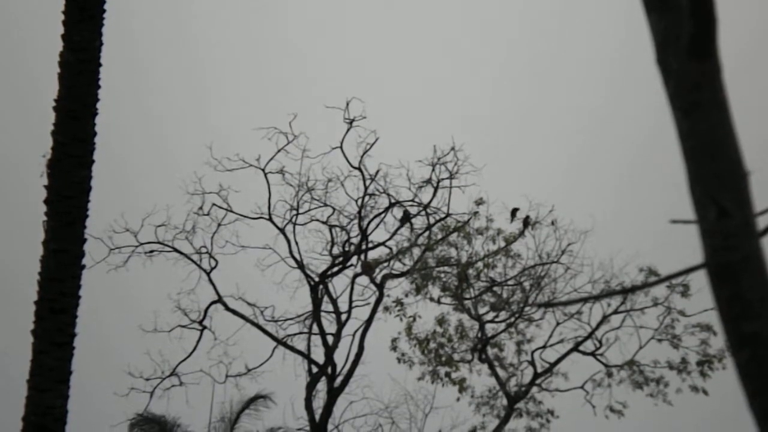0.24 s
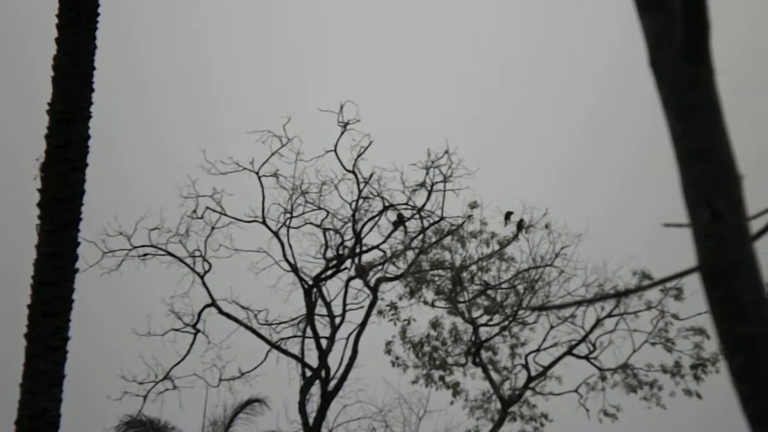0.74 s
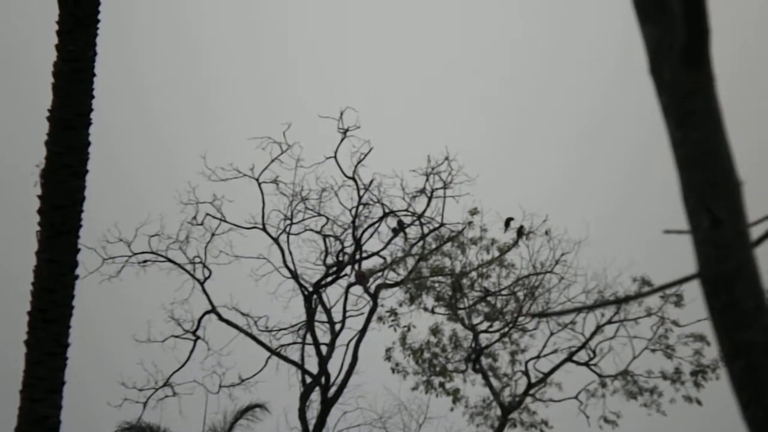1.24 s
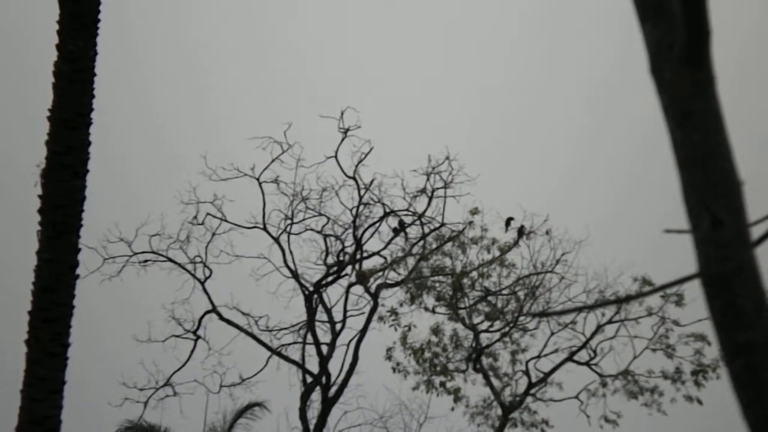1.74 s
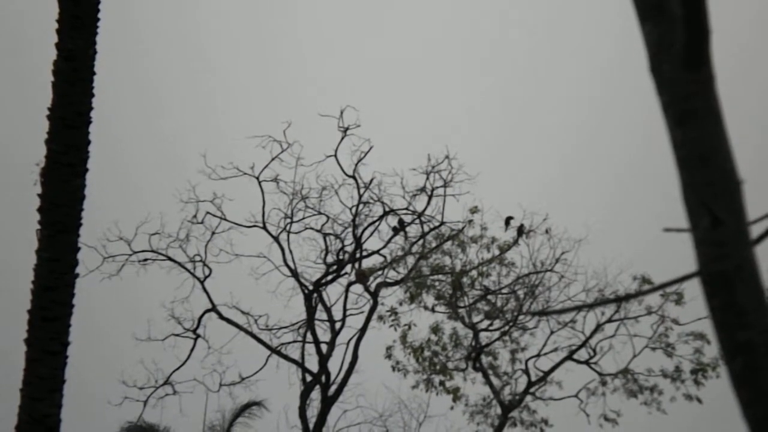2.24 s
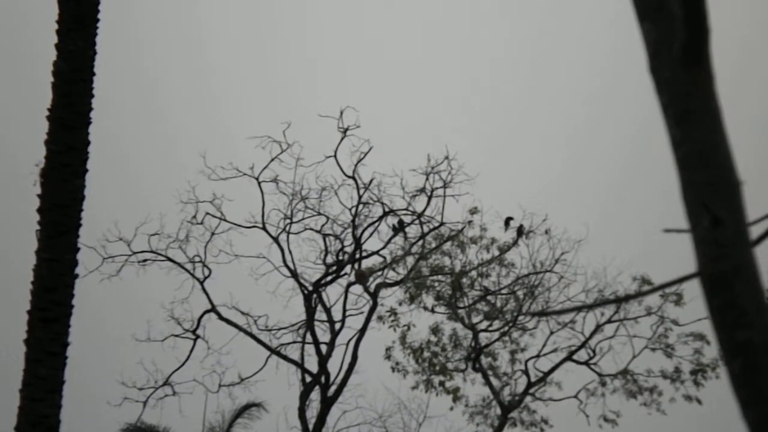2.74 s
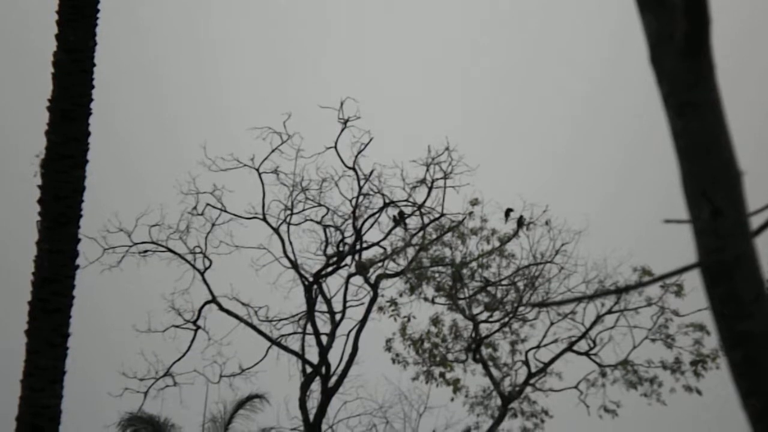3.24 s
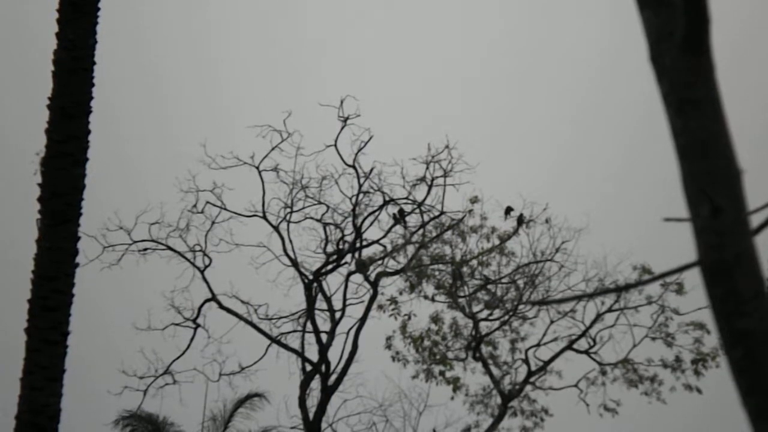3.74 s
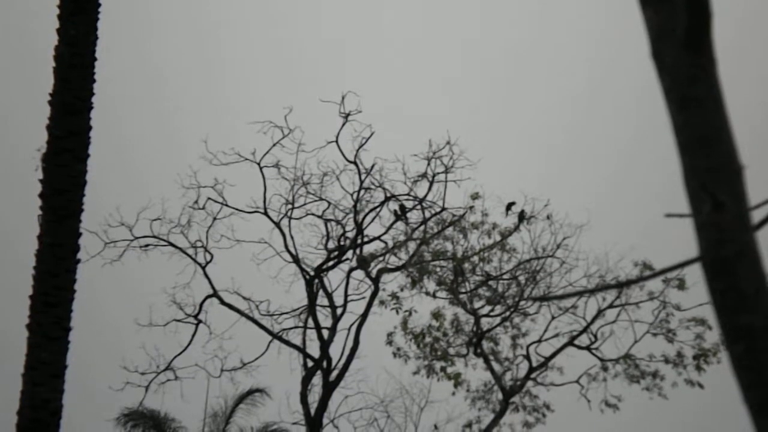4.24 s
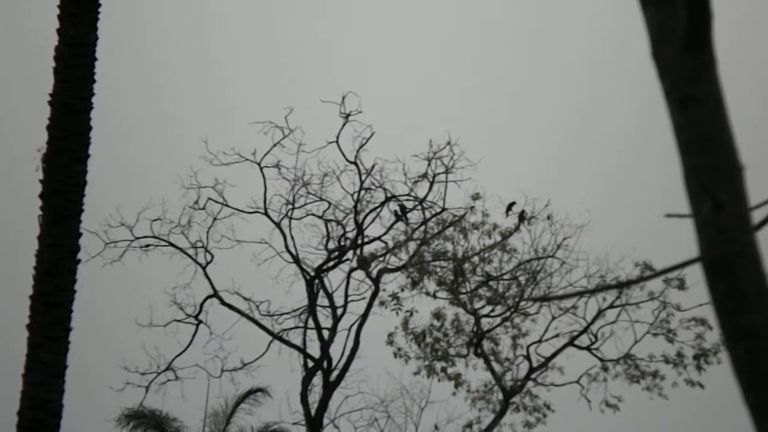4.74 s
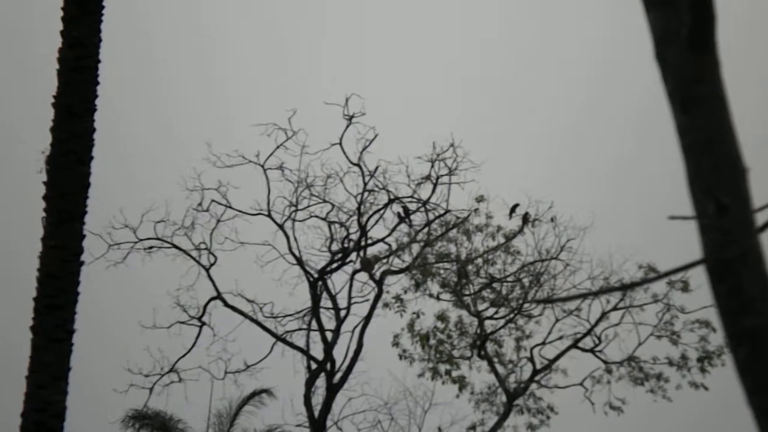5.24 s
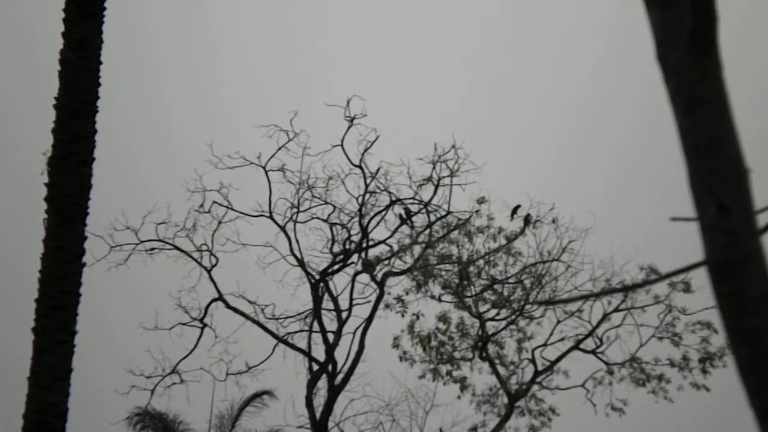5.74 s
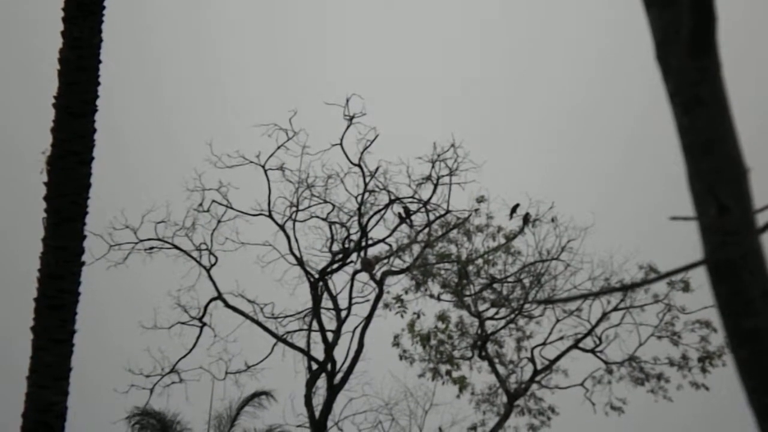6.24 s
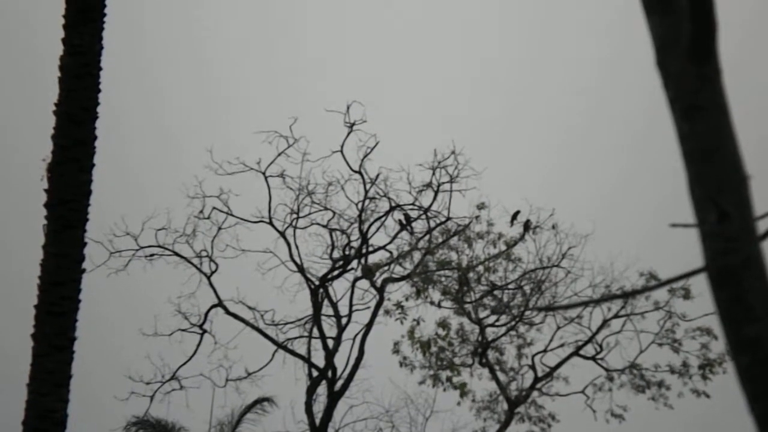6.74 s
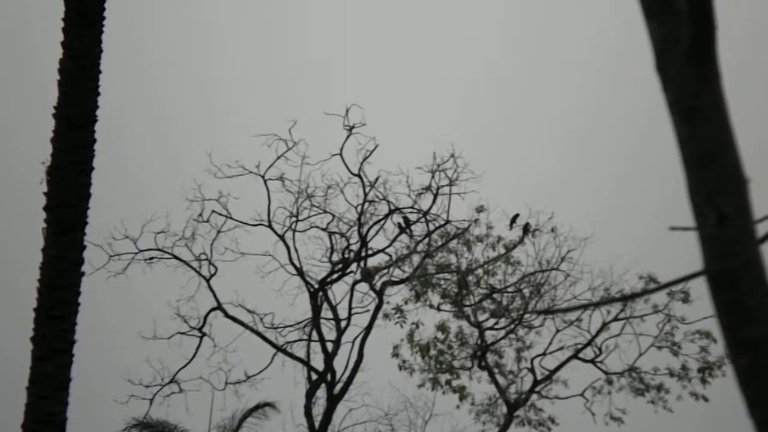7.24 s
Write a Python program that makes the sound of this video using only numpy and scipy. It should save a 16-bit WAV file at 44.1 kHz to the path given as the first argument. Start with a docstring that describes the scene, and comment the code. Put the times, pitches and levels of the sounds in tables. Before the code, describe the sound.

Several birds call from trees, heard at a modest distance with soft diffuse echoes. Clear fluted whistles come first, with one faint nasal bray and thin peeps among them. Around the middle, piercing downward chirps lead into a string of rough, throaty squawks. Afterward two weaker squawks and a few pips remain. Tonal cricket chirps, fizzing buzzes and a fine steady treble trill continue over faint air noise.

```python
"""Birds and insects across a yard

A near bird whistles by near-sine tones, with one low coo, likely a dove; small birds peep and swoop,
a nasal call brays, and a harsh caller squawks by uneven pulses and noise puffs shaped by a throat.
Crickets chirp, one near and one far, by stroking resonant wing modes; other insects trill, buzz and hum
over a soft noise wash. Trees and walls return a diffuse tail; the ground returns some notes almost at once."""
import sys
import numpy as np
from scipy import signal
from scipy.fft import rfft, irfft
from scipy.io import wavfile
from scipy.ndimage import uniform_filter1d

SR = 44100
rng = np.random.default_rng(int(sys.argv[2]) if len(sys.argv) > 2 else 0)


def generate_wav(signal):
    """Clip the signal to [-1, 1] and save it as 16-bit WAV at the path in sys.argv[1]."""
    frames = np.transpose(np.atleast_2d(signal))
    scaled = np.clip(frames, -1, 1) * 32767
    pcm = np.round(scaled).astype(np.int16)
    wavfile.write(sys.argv[1], SR, pcm)


N = 329868  # length [samples]


def gain_of(db):
    """Logarithmic level: 20 dB is a factor of ten in amplitude."""
    return 10 ** (np.asarray(db) / 20)


def evened(x):
    """Power normalisation: scales to rms 1."""
    return x / np.sqrt(np.mean(x ** 2) + 1e-20)


def read(points, hz):
    """Spectral envelope: a table interpolated on a log-frequency axis."""
    f, value = np.transpose(points)
    return np.interp(np.log(hz + 1), np.log(f + 1), value)


def add(mix, s, sound):
    """Superposition: mixes a sound in at s seconds."""
    part = mix[round(s * SR):][:len(sound)]
    part += sound[:len(part)]


def unroll(rows):
    """Linear interpolation: time and every column of a curve, at the sample rate."""
    s, *columns = np.transpose(rows)
    t = np.arange(s[0], s[-1], 1 / SR)
    return t, [np.interp(t, s, column) for column in columns]


def drift(count, per_s):
    """Low-passed noise: smooth random wavering of rms 1."""
    size = max(int(SR / per_s), 1)
    smooth = uniform_filter1d(rng.standard_normal(count), size)
    return evened(uniform_filter1d(smooth, size))


def resonate(x, modes):
    """Modal resonance: a sum of steep resonances, each of peak gain 1 before its own level."""
    out = np.zeros(len(x))
    for hz, width, db in modes:
        r = np.exp(-np.pi * width / SR)
        pole = [1, -r * np.exp(2j * np.pi * hz / SR)]
        once = signal.lfilter([1 - r], pole, x)
        twice = signal.lfilter([1 - r], pole, once)
        out += gain_of(db) * 2 * twice.real
    return out


def wash():
    """Shaped noise: distant air and microphone hiss as random short-time spectra with faint patches."""
    # spectrum of the hiss: (frequency [Hz], relative density [dB per Hz])
    spectrum = [(25, -37), (60, -21), (340, -6.5), (666, -3), (1050, -5.5), (2000, -9), (3600, -12),
                (4200, -11), (4750, -8), (5500, -10.5), (7000, -8.5), (8500, -11), (10300, -16),
                (11000, -16), (15500, -19)]
    level_db = -63
    frames, hz = N // 256 + 5, np.fft.rfftfreq(1024, 1 / SR)
    a, b, patches = rng.standard_normal((frames, 513, 3)).T
    patches = uniform_filter1d(uniform_filter1d(patches, 12, 0), 14, 1)
    patchy_db = 1.1 * evened(patches)
    z = (a + 1j * b) * gain_of(read(spectrum, hz)[:, None] + patchy_db)
    hiss = signal.istft(z, nperseg=1024, noverlap=768)[1][:N]
    return gain_of(level_db) * evened(hiss)


def treble_insects():
    """Amplitude modulation: a steady trill of short pips, a thin unbroken hum, and a flickering far chorus."""
    # far insects: (time [s], level [dB])
    chorus_level = [(0, -65.5), (1, -67), (2.3, -66), (3, -64), (4.9, -65), (5.6, -71), (6.2, -67),
                    (6.8, -66.5), (7.05, -73), (7.25, -61.5), (7.48, -75)]
    trill_hz, trill_db, trill_per_s, trill_start_s = 9020, -61, 30.0, .0263
    hum_hz, hum_db = 9779, -70
    t = np.arange(N) / SR
    place = ((t - trill_start_s) * trill_per_s) % 1 / trill_per_s  # seconds into each pip
    pips = np.clip(np.minimum(place / 0.00087, (.0115 - place) / 0.0024), 0, 1)
    pips *= gain_of(1.2 * drift(N, 20))
    trill = pips * np.sin(2 * np.pi * np.cumsum(trill_hz + 40 * drift(N, 40.55)) / SR)
    hum = np.sin(2 * np.pi * np.cumsum(hum_hz + 5 * drift(N, 50)) / SR)
    hum *= gain_of(1.3 * drift(N, 60))
    flicker = gain_of(2.8 * drift(N, 26)) * rng.standard_normal(N)
    chorus = evened(resonate(flicker, [(7704, 470, -8.0), (7400, 140, -19.0), (7950, 180, -12.0)]))
    chorus *= gain_of(np.interp(t, *np.transpose(chorus_level)))
    return gain_of(trill_db) * trill + gain_of(hum_db) * hum + chorus


def buzzer():
    """Stridulation: double wing strokes of noisy scraping excite wing resonances, in bursts."""
    # bursts: (start [s], end [s], level [dB])
    bursts = [(0.358, 0.644, -59), (1.34, 1.642, -60), (2.414, 2.775, -59), (3.365, 3.609, -58.5),
              (4.41, 4.75, -59.5), (5.357, 5.575, -59), (6.35, 6.422, -62.5), (6.678, 6.743, -59.5),
              (7.37, 7.476, -59)]
    # wing resonances: (frequency [Hz], width [Hz], gain [dB])
    wing_modes = [(6100, 200, -9.5), (6860, 620, -6), (7400, 170, -8), (8760, 230, -5), (8950, 2000, -14)]
    t = np.arange(N) / SR
    strokes = np.cumsum(150.0 * (1 + .01 * drift(N, 10))) / SR
    scrape = np.exp(-(strokes % 1) / 0.17) + 0.42 * np.exp(-((strokes + .5) % 1) / 0.43)
    buzz = evened(resonate(scrape * rng.standard_normal(N), wing_modes))
    on = sum(gain_of(db) * (t > start) * (t < end) for start, end, db in bursts)
    return buzz * uniform_filter1d(on, 300)


def crickets():
    """Stridulation: a lead stroke, a pause, then tonal wing strokes that swell, slow and end on a whole stroke."""
    # chirps of a near cricket, and of a far one in the two faint rows:
    # (start [s], level before swell and wing modes [dB], length before the last stroke ends [s])
    chirps = [(0.3143, -45, 0.16), (0.982, -46, 0.17), (1.604, -44.5, 0.17), (2.164, -44, 0.16),
              (2.773, -44.5, 0.16), (3.088, -56.5, 0.22), (3.534, -44.5, .16), (5.19, -46, 0.14),
              (5.739, -46.5, 0.15), (6.259, -45.5, 0.16), (6.798, -44.5, .17), (7.003, -59.5, 0.13),
              (7.359, -44.5, 0.16)]
    # wing modes: (frequency [Hz], random spread [Hz], gain [dB])
    wing_modes = [(4810, 108, 4), (5200, 70, -2.5), (5600, 70, -3.5), (6400, 180, -11.5)]
    near_db = -47
    far_dull = 0.68  # dB lost by the upper wing modes for each dB that a chirp lies under near_db
    out = np.zeros(N)
    for s, db, length in chirps:
        t = np.arange(0, length + .01, 1 / SR)
        strokes = np.cumsum(139 - 70 * t + 4 * drift(len(t), 100)) / SR
        place, last = strokes % 1, np.ceil(strokes[int(length * SR)])
        sounding = (strokes < 1) | ((strokes > 2) & (strokes < last))
        attack = np.minimum(place / np.where(strokes < 1, .2, .35), 1)
        scrape = attack * np.exp(-(place / 0.5) ** 2) * sounding
        swell_db = np.where(strokes < 1, -5.5, -16 + 17 * np.tanh(3.3 * t / length))
        swell_db = swell_db + 0.81 * drift(len(t), 100)
        sag_hz = 700 * (place - .25)  # each stroke slows, so its pitch falls
        wing = np.zeros(len(t))
        for hz, spread, mode_db in wing_modes:
            dull_db = (hz > 5000) * far_dull * min(db - near_db, 0)
            turns = np.cumsum(hz - sag_hz + spread * drift(len(t), 930)) / SR
            wing += gain_of(mode_db + dull_db) * np.cos(2 * np.pi * turns)
        add(out, s, gain_of(db + swell_db) * scrape * wing)
    return out


def ticks():
    """Damped vibration: small dry close taps, each two decaying partials and a little noise."""
    # taps: (time [s], level of the main partial [dB], frequency [Hz])
    taps = [(0.368, -38.5, 2750), (5.468, -50, 716), (6.674, -55, 607)]
    out, t = np.zeros(N), np.arange(600) / SR
    for s, db, hz in taps:
        ring = np.sin(2 * np.pi * hz * t) + 0.5 * np.sin(2 * np.pi * 0.69 * hz * t)
        ring += 0.034 * rng.standard_normal(600)
        decaying = gain_of(db - 60 * t / 0.018) * ring
        add(out, s, np.diff(decaying) * SR / (2 * np.pi * hz))  # the slope, scaled to keep the level at hz
    return out


def yard(x, tail_db, t60, early_db=-12):
    """Diffuse reverberation: early scatter from near branches, then a tail; two sets of returns trade places."""
    t = np.arange(SR) / SR
    taps = rng.standard_normal((2, SR)) * (rng.random((2, SR)) < .1) * (t > .004)
    tail, early = taps * gain_of(-60 * t / t60), taps * gain_of(-60 * t / .12)
    response = gain_of(tail_db) * tail / np.linalg.norm(tail[0])
    response += gain_of(early_db) * early / np.linalg.norm(early[0])
    response = signal.lfilter([.6], [1, -.4], response)  # air and leaves dull the returns
    sway = 2 * np.pi * .3 * drift(N, 45)  # moving leaves blend one set into the other at even power
    first, second = signal.fftconvolve(x[None], response, axes=1)[:, :N]
    return x + first * np.cos(sway) + second * np.sin(sway)


def grounded(start, sound, delay_s, share):
    """Comb interference: the direct sound and its return from the ground carve notches along a glide."""
    lag = np.zeros(round(delay_s * SR))
    return start, (np.append(sound, lag) + share * np.append(lag, sound)) / np.sqrt(1 + share ** 2)


def whistle(rows, half_db=-60, second_db=-60, third_db=-60, flutter=60, depth=0.25, warble_hz=20, bend=400):
    """Syrinx oscillation: a near sine that a slower second oscillator makes flutter in level and pitch."""
    t, (hz, db) = unroll(rows)
    hz = uniform_filter1d(hz, min(len(t) // 4, bend), mode="nearest")  # the pitch bends smoothly
    push = gain_of(.5 * (db - db.max())) * (hz / hz.max()) ** 3  # overtones grow with effort and pitch
    beat = np.cos(2 * np.pi * np.cumsum(flutter * (1 + 0.195 * drift(len(t), 48.0))) / SR)
    turns = 2 * np.pi * np.cumsum(hz + warble_hz * beat + 25 * drift(len(t), 330)) / SR
    half_lines = np.sin(turns / 2) + 0.67 * np.sin(3 * turns / 2) + np.sin(5 * turns / 2)
    tone = np.sin(turns) + gain_of(half_db) * half_lines
    tone += push * (gain_of(second_db) * np.sin(2 * turns) + gain_of(third_db) * np.sin(3 * turns))
    edge = np.clip(np.minimum(t - t[0], t[-1] - t) / 0.0015, 0, 1)
    level = np.sqrt(2) * gain_of(db + 1.1 * drift(len(t), 150))
    return t[0], level * tone * (1 + np.clip(depth, 0, 1) * beat) * edge


def swoop(start, fall, top_hz, end_hz, db, bow, loudest, upstroke):
    """Frequency glide: a quick upstroke if it is long enough, then a fall that swells and fades."""
    u = np.linspace(0, 1, num=16)
    level = db + np.interp(u, [0, loudest, 1], [-22, 0, -13.5])
    rows = np.transpose([start + fall * u, top_hz + (end_hz - top_hz) * u ** bow, level])
    if upstroke < .016:
        return rows
    lead = [(start - upstroke, 5280, -52), (start - upstroke / 2, .95 * top_hz, -63)]  # (s, Hz, dB)
    return np.vstack([lead, rows])


def small_birds(mix):
    """Frequency modulation: falling swoops, level pips and wavering peeps, all near sines."""
    # swoops: (time of the top [s], fall [s], top [Hz], end [Hz], peak level [dB],
    # bow of the fall [1 = straight], loudest place [share of the fall], upstroke [s, none under 0.016])
    swoops = [ (0.219, 0.048, 8200, 6600, -56, 1.2, 0.36, 0), (.3, 0.046, 7800, 6550, -57, 1, .25, 0),
              (.51, 0.068, 7850, 5900, -55, 2.1, 0.57, 0),
              (0.701, 0.041, 6700, 5540, -60.5, 1.1, 0.48, 0.005),
              (0.809, 0.057, 8000, 5740, -56.5, 1.4, 0.39, 0), (1.188, 0.06, 7600, 5500, -58, 3.1, .7, 0),
              (1.876, 0.1, 8300, 5930, -56.5, 1, 0.47, 0), (2.14, 0.057, 7960, 5870, -56.5, 0.89, 0.87, 0),
              (3.13, 0.082, 8070, 5760, -45.5, 3, 0.85, 0.022),
              (3.291, 0.088, 8320, 5600, -39, 1.9, 0.72, .025),
              (3.46, 0.078, 8200, 5840, -41.5, 2.2, 0.75, 0),
              (3.635, 0.099, 8120, 5920, -39.5, 2.6, 0.85, 0),
              (3.81, .17, 8500, 5190, -39.5, 0.95, 0.23, 0.014),
              (4.255, 0.17, 8650, 6050, -44, 0.93, 0.51, 0.023), ]
    # pips: (start [s], length [s], pitch [Hz], starting level [dB])
    level_pips = [(1.605, 0.042, 7050, -54), (1.717, 0.046, 7060, -55.5), (2.585, 0.014, 5700, -62),
                  (2.646, .012, 4900, -63), (2.887, 0.03, 8100, -58), (3.333, .02, 5700, -64),
                  (3.537, 0.02, 7950, -52), (3.736, 0.026, 6950, -50.5), (6.385, 0.038, 7000, -55.5),
                  (6.502, 0.03, 6960, -54)]
    # wavering notes, one table a note: (time [s], pitch [Hz], level [dB])
    peeps = [
        [(0, 4320, -66), (.013, 5520, -67), (.033, 5500, -66), (.047, 4700, -64), (.065, 5480, -69),
         (.078, 5300, -72), (.09, 4100, -69), (.103, 5200, -76), (.13, 5170, -62), (.145, 5200, -73)],
        [(2.34, 4670, -70), (2.348, 3820, -57), (2.36, 3840, -57), (2.368, 3950, -62)],
        [(2.75, 7870, -60), (2.78, 7140, -47), (2.81, 7960, -53)],
        [(2.945, 7800, -52), (2.977, 7020, -44.5), (3.004, 7530, -48.5), (3.018, 6970, -45),
         (3.04, 5900, -52.5)],
        [(3.425, 3180, -68), (3.44, 3350, -71), (3.45, 4000, -66)],
        [(4.11, 6900, -54), (4.14, 7300, -40), (4.17, 8020, -52)],
        [(6.67, 5360, -78), (6.72, 5750, -83), (6.775, 5770, -78), (6.79, 5600, -61), (6.797, 5650, -63)],
        [(7.21, 4530, -80), (7.222, 4730, -67), (7.264, 5820, -68), (7.315, 6180, -62)],
    ]
    pip_fade_db = -1.5
    curves = [swoop(*row) for row in swoops]
    for s, length, hz, db in level_pips:
        curves.append([(s, hz, db), (s + length, hz, db + pip_fade_db)])
    for rows in curves:
        add(mix, *whistle(rows, flutter=230, depth=0.34))
    for rows in peeps:
        add(mix, *whistle(rows, bend=200))


def squawk(rows, throat, rough, uneven, low_db=-60):
    """Source and filter: strong and weak pulses in turn and noise puffs pass a throat; low lines stay clear."""
    # noise gain toward the treble, taken off the pulses: (frequency [Hz], gain [dB])
    airy_table = [(4200, -2.5), (6200, 2.5)]
    broken_db, broken_per_s = 8, 80  # each partial wavers in level on its own
    t, (db, hz) = unroll(rows)
    hz = uniform_filter1d(hz, 300, mode="nearest")
    steady = np.cumsum(hz / 2) / SR  # turns of a strong-weak pair
    pairs = steady + np.cumsum(hz * .022 * rough * drift(len(t), 300)) / SR
    folds = np.zeros(len(t))
    for k in range(1, 24):
        strength = uneven if k % 2 else 1  # odd lines make the pulses unequal
        waver_db = broken_db * (.3 * rough + .02 * k) * drift(len(t), broken_per_s)
        folds += strength * gain_of(waver_db) * np.cos(2 * np.pi * k * pairs + 0.099 * k * k)
    puffs = (0.26 + np.exp(-(2 * pairs % 1) / 0.26)) * rng.standard_normal(len(t))
    f = np.fft.rfftfreq(len(t), 1 / SR)
    airy = gain_of(read(airy_table, f))
    drive = rfft((1 - rough) * evened(folds)) / airy + rfft(rough * evened(puffs)) * airy
    voiced = irfft(drive * gain_of(read(throat, f)), len(t))
    low = np.zeros(len(t))
    for k, share in [(4, .75), (8, 1.1)]:  # the pitch and its octave
        low += share * np.cos(k * np.pi * steady) * gain_of(4 * drift(len(t), 70))
    call = evened(voiced) * gain_of(3.4 * rough * drift(len(t), 150)) + gain_of(low_db) * low
    return t[0], gain_of(db + 6.5) * call * signal.windows.tukey(len(t), .24)


def bray(mix):
    """Formant filtering: one clear nasal call of mostly regular pulses."""
    # curve of the call: (time [s], effort [dB], pitch [Hz])
    curve = [(1.3, -55, 796), (1.32, -57, 967), (1.345, -56.5, 979), (1.4, -59, 1002), (1.415, -59.5, 967),
             (1.435, -61, 743)]
    # throat: (frequency [Hz], gain [dB])
    nasal_throat = [(1200, -42), (1600, -29), (1950, -7), (2950, -4.5), (3450, -9), (3900, -22),
                    (5000, -24), (5900, -12), (6800, -14), (7400, -2), (8300, -19), (8900, -0.5),
                    (9800, -21), (10400, -5), (11500, -49)]
    add(mix, *squawk(curve, nasal_throat, 0.11, 0.63))


def gasps(mix):
    """Turbulent pulsing: faint rasps as the harsh caller draws air between calls."""
    # gasps: (start [s], length [s], effort [dB], starting pulse rate [Hz])
    breaths = [(3.949, 0.047, -59, 483), (4.168, 0.066, -59, 479), (4.403, 0.057, -61.5, 485),
               (4.652, 0.078, -68, 480)]
    # throat: (frequency [Hz], gain [dB])
    gasp_throat = [(1500, -42), (2100, -18), (2500, 0), (3000, -16), (3700, -5), (4400, -14), (6500, -10),
                   (9000, -40)]
    for s, length, db, hz in breaths:
        add(mix, *squawk([(s, db, hz), (s + length, db, 1.1 * hz)], gasp_throat, 0.51, 0.83))


def harsh_call(start, climb, jump, length, db, low_hz, held_hz, rough, uneven, fall, end_pitch, clear_db, arch, tilt_db):
    """Register break: effort, pitch, roughness and strong-weak share follow a climb, break, arched hold and fall."""
    # throat before tilt: (frequency [Hz], gain [dB])
    call_throat = [(600, -34), (1000, -18), (1500, -21.5), (2000, -7.5), (2700, -4.5), (3400, -4),
                   (4000, -7), (4600, -11.5), (5250, -5.5), (5900, -9), (6500, -1), (7300, -9.5),
                   (8200, -13), (9500, -30), (12000, -51)]
    # held part: (place [share of its length], bend [share of the arch], effort [dB])
    arch_shape = [(0, -1, -3.5), (.3, -.2, -1), (.6, 0, 0), (1, -.3, -1.5)]
    start_db, end_db = -13, -10
    held = climb + jump
    falls = max(length - fall, held + .004)
    place, bend, swell_db = np.transpose(arch_shape)
    s = start + np.array([0, climb, *(held + (falls - held) * place), length])
    # effort swells evenly up to the held part
    effort = db + np.array([start_db, start_db * jump / held + swell_db[0], *swell_db, end_db])
    pitch = [.94 * low_hz, low_hz, *(held_hz * (1 + arch * bend)), end_pitch * low_hz]
    rows = np.transpose([s, effort, pitch])
    t = unroll(rows)[0]
    roughs = np.interp(t, s[[0, 1, 2, -2, -1]], [.5, .56, rough, rough, .5])
    unevens = np.interp(t, s[[1, 2, 4, -2, -1]], [.4, uneven ** 2, uneven, uneven ** 2, .4])
    # the clear low lines lead the climb and die first in the fall
    low_db = clear_db + np.interp(t, s[[1, 2, -2, -1]], [7, 0, 0, -10])
    throat = [(hz, gain_db + tilt_db * np.log2(hz / 4000)) for hz, gain_db in call_throat]
    return squawk(rows, throat, roughs, unevens, low_db=low_db)


def harsh_caller(mix):
    """Nonlinear voicing: calls climb in a low register, break up to a held pitch and fall."""
    # calls: (start [s], climb [s], break [s], whole length [s], effort [dB], low pitch [Hz], held pitch [Hz],
    # held roughness [0-1], held strong-weak share [0-1], fall [s], end pitch [share of low pitch],
    # clear low lines [dB], arch [share of held pitch], brightness [dB per octave])
    calls = [ (3.519, 0.033, 0.096, 0.15, -57, 858, 1006, 0.88, 1, 0.038, 0.81, -16.5, 0.027, -0.2),
             (3.77, 0.081, 0.013, 0.16, -42.5, 1154, 1290, 0.55, 0.7, 0.045, .8, -23.5, 0.014, 1),
             (4.006, 0.056, 0.019, 0.15, -42, 1120, 1281, 0.53, 0.8, .035, 0.85, -20.5, 0.017, 2.9),
             (4.226, 0.05, 0.011, 0.16, -43.5, 1150, 1395, 0.34, 0.06, 0.027, 0.66, -24.5, 0.06, 2.5),
             (4.479, 0.03, 0.012, 0.15, -42.5, 1111, 1464, 0.5, 0.87, 0.043, 0.81, -18.5, 0.066, 3.2),
             (4.736, .049, 0.0114, .155, -45.5, 1076, 1363, 0.26, 0.21, .03, 0.78, -19.5, .045, 2),
             (5.154, 0.054, 0.029, 0.16, -53, 979, 1070, 0.71, 0.92, 0.031, 0.85, -15.5, 0.0195, -1),
             (6.027, 0.042, 0.016, 0.17, -54, 929, 1054, 0.49, 0.97, 0.026, 0.72, -13.5, 0.025, 0.5), ]
    for row in calls:
        add(mix, *harsh_call(*row))


def drop(start, length, top_hz, db):
    """Frequency glide: the pitch falls straight while the level holds, then fades."""
    end_hz, hold, fade_db = 1365, 0.47, -14.5  # the hold is a share of the length
    u = np.array([0, hold, 1])
    return np.transpose([start + length * u, top_hz + (end_hz - top_hz) * u, db + fade_db * (u == 1)])


def near_whistlers(mix):
    """Syrinx oscillation: near whistled notes and short drops, and one low coo, likely a dove."""
    # one table a note, the last the low coo: (time [s], pitch [Hz], level [dB]);
    # the whistle at 0.52 s has two overlapping voices, a table each
    notes = [
        [(0.0, 2350, -73.5), (0.2, 2530, -77.5), (0.234, 2430, -70), (0.26, 2490, -86)],
        [(0.52, 2520, -66), (0.542, 2457, -50), (0.562, 2440, -52.5), (0.6, 2300, -57)],
        [(0.545, 2190, -53), (0.572, 2130, -53), (0.6, 2067, -50), (0.635, 1900, -51.5), (0.665, 1640, -62.5),
         (0.7, 1335, -66)],
        [(0.972, 4510, -59), (.985, 4700, -52), (1.015, 4764, -47.5), (1.028, 4790, -45), (1.039, 4610, -38),
         (1.06, 4040, -43), (1.08, 3350, -38.5), (1.095, 2840, -43), (1.105, 2470, -66)],
        [(1.53, 2450, -65), (1.548, 2917, -41), (1.562, 2888, -40), (1.58, 2910, -43), (1.6, 2930, -40.5),
         (1.62, 2690, -50), (1.64, 2410, -58)],
        [(1.895, 2345, -75), (1.91, 2494, -44.5), (1.925, 2730, -50), (1.958, 2770, -47.5), (2.03, 2717, -49),
         (2.076, 2557, -48.5), (2.15, 2340, -62.5)],
        [(2.355, 2890, -48), (2.368, 3100, -42.5), (2.376, 3294, -42), (2.388, 3313, -38.5),
         (2.41, 3286, -40.5), (2.435, 3185, -43), (2.46, 2740, -49), (2.472, 2540, -59)],
        [(2.64, 578, -76), (2.67, 619, -67), (2.744, 608, -64), (2.77, 624, -70)],
    ]
    # voice of each table: (half-pitch lines [dB], 2nd harmonic at full push [dB], 3rd harmonic at full push [dB],
    # flutter rate [per s], flutter depth [0-1, none if negative], warble [Hz])
    voices = [(-42, -42, -40, 27.5, 0.8, 22), (-37, -19, -35, 88.5, 0.5, 30), (-30, -20, -35, 81, 0.96, 39),
              (-42, -4, -29, 120, 0.4, 20), (-37, -21, -18, 25.2, 0.57, 5.9),
              (-22, -17, -7.5, 110, 0.54, 27), (-44, -13.5, -12.5, 42, 0, 5.1), (-35, -20, -38, 16, 0.1, 6)]
    # ground return of each table: (delay [s], share of the direct sound)
    ground_returns = [(.003, 0), (.003, 0), (.003, 0), (.00261, .6), (.00357, .4), (.00357, .2),
                      (.00357, .55), (.003, 0)]
    # drops, all ending on one low pitch: (start [s], length [s], top [Hz], level [dB])
    drops = [(1.815, 0.033, 2030, -54.5), (2.233, 0.033, 2090, -51), (2.547, 0.035, 2575, -47)]
    # voice of the drops: columns as in voices
    drop_voice = (-45, -21, -37, 97, -0.3, 34)
    # ground return of the drops: columns as in ground_returns
    drop_ground = (.00244, .5)
    for rows, voice, ground in zip(notes, voices, ground_returns):
        add(mix, *grounded(*whistle(rows, *voice, bend=500), *ground))
    for row in drops:
        add(mix, *grounded(*whistle(drop(*row), *drop_voice), *drop_ground))


def scene():
    """Superposition: all callers in the yard, over insects, taps and wash."""
    whistles, harsh = np.zeros(N), np.zeros(N)
    small_birds(whistles)
    bray(whistles)
    gasps(harsh)
    harsh_caller(harsh)
    near_whistlers(whistles)
    insects = yard(crickets() + buzzer(), -9, .4, early_db=-20)
    birds = yard(whistles, -13, 0.88, early_db=-10.5) + yard(harsh, -10, 0.85, early_db=-6)
    mono = wash() + treble_insects() + insects + ticks() + birds
    return np.array([mono, mono])


def record(dry):
    """Phase delay and band limit: the left channel lags the right by one sample, then a low-pass."""
    left_lag_s, edge_hz = 1 / 44100, 15600
    half_lag = np.pi * np.fft.rfftfreq(N, 1 / SR) * left_lag_s  # phase of half the lag [rad]
    pair = irfft(rfft(dry) * np.exp(1j * np.array([-half_lag, half_lag])), N)
    low_pass = signal.firwin(511, edge_hz, window=("kaiser", 9), fs=SR)
    return signal.oaconvolve(pair, low_pass[None], "same")


dry = scene()
out = record(dry)
generate_wav(out)
```